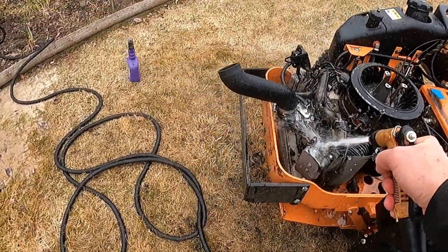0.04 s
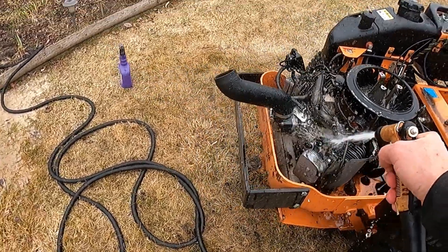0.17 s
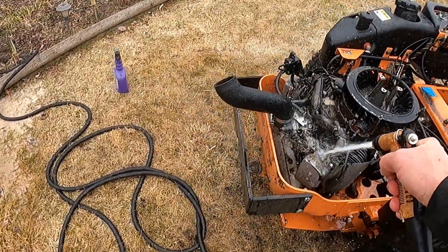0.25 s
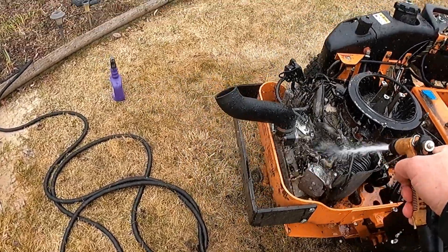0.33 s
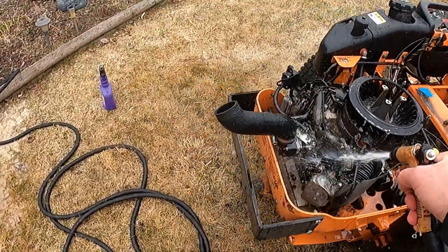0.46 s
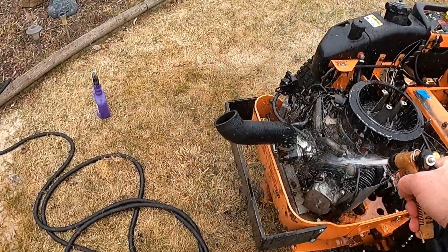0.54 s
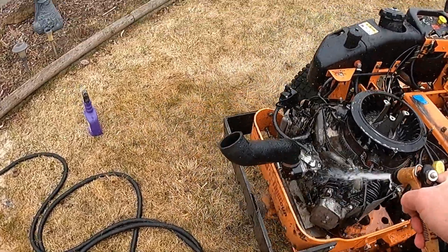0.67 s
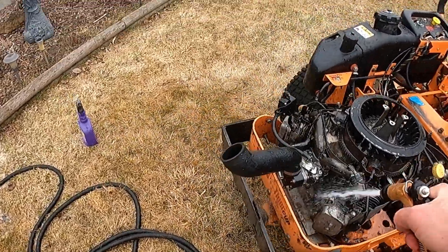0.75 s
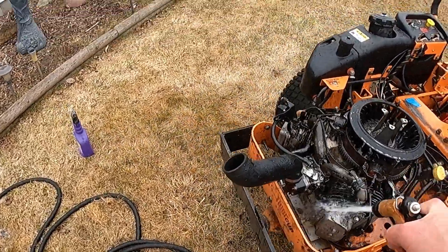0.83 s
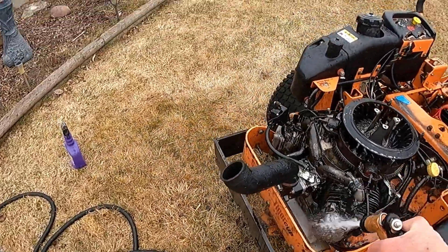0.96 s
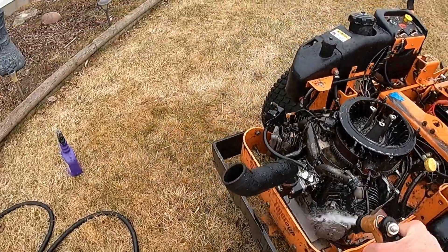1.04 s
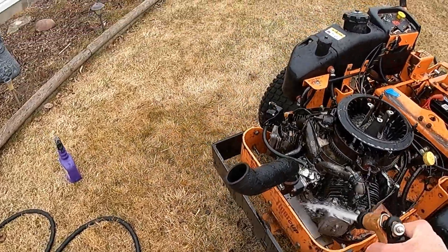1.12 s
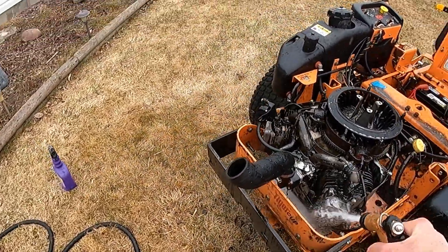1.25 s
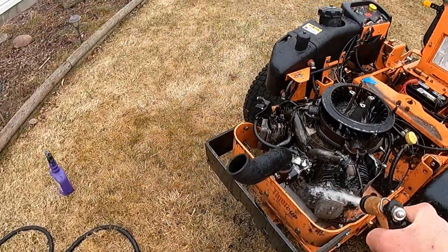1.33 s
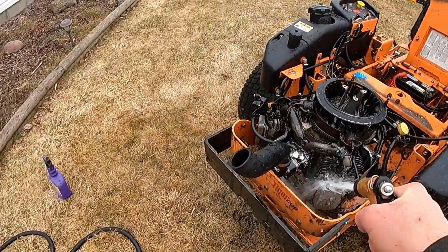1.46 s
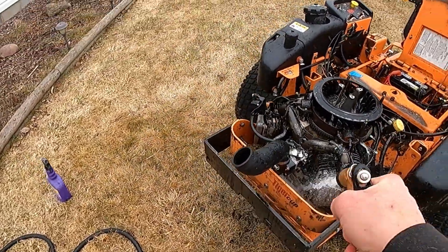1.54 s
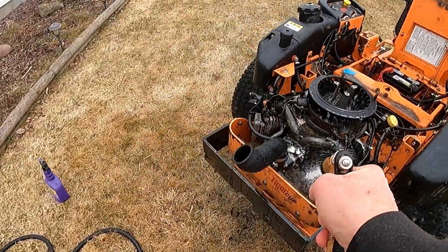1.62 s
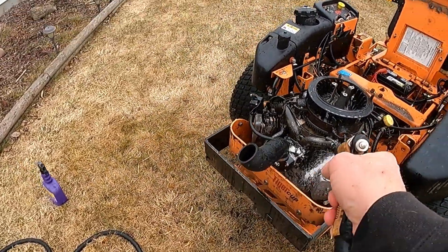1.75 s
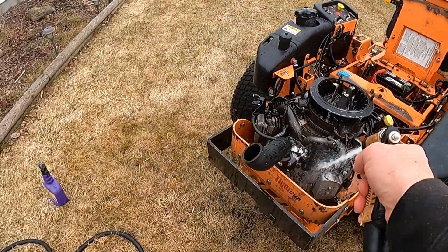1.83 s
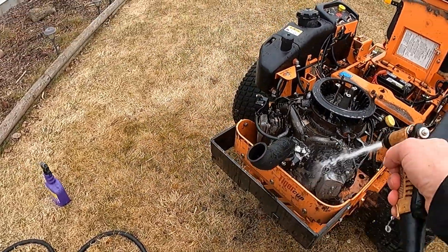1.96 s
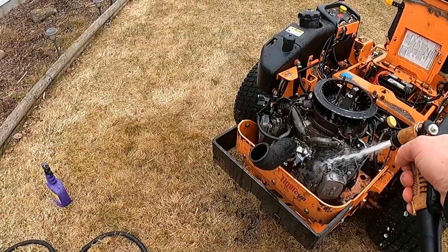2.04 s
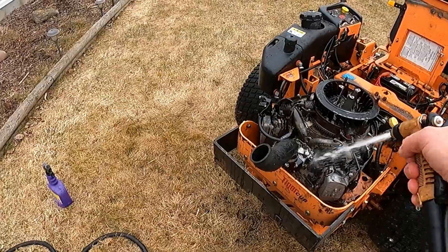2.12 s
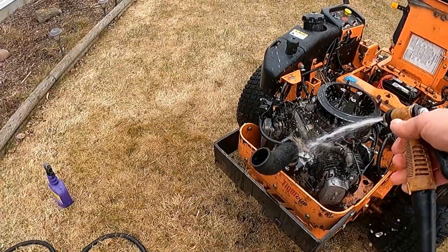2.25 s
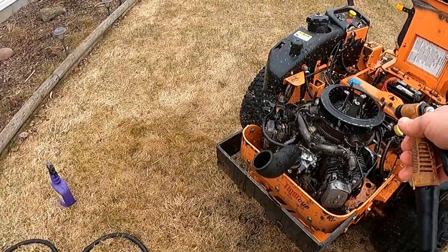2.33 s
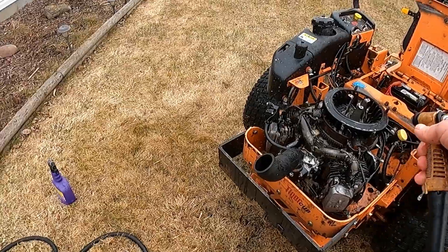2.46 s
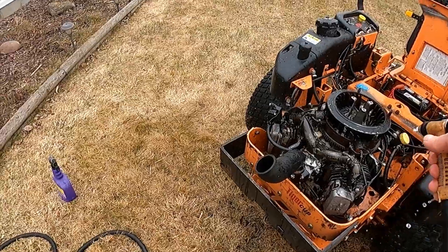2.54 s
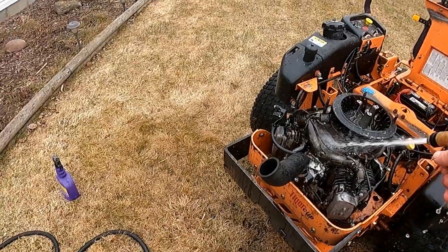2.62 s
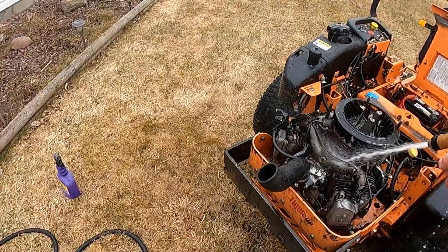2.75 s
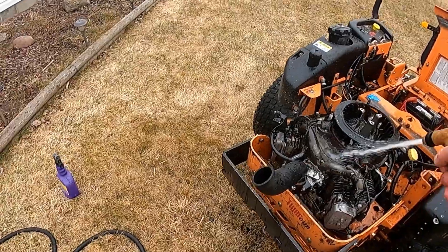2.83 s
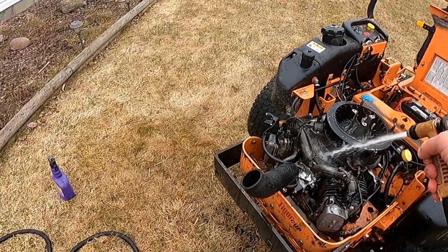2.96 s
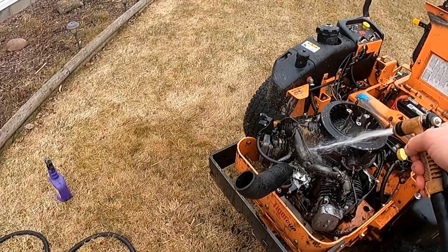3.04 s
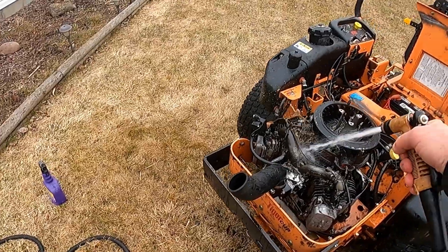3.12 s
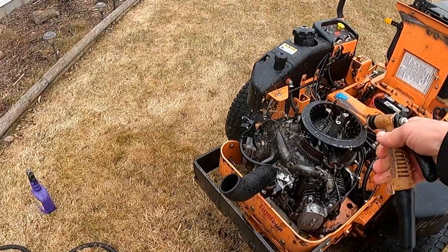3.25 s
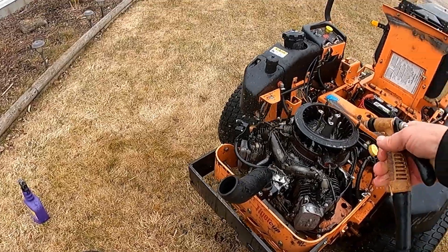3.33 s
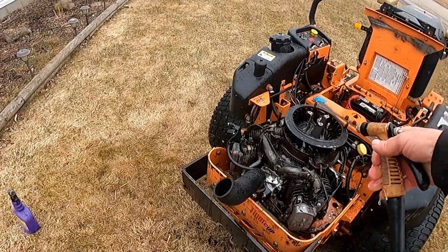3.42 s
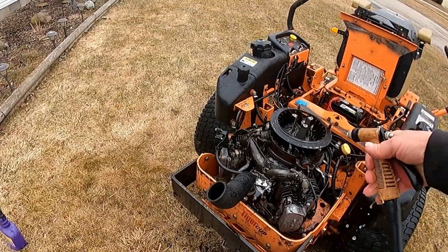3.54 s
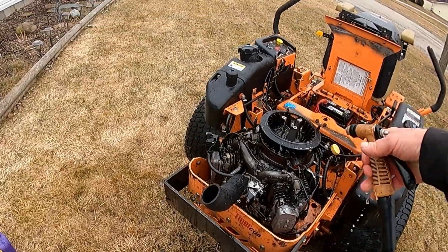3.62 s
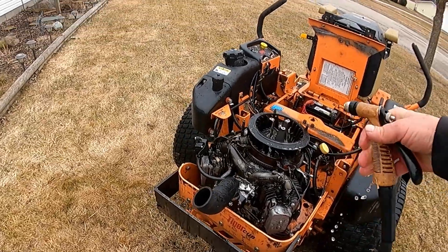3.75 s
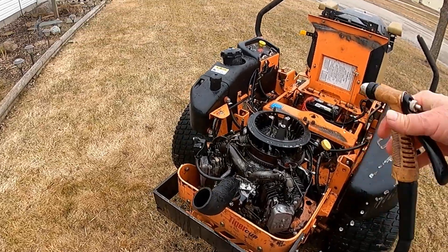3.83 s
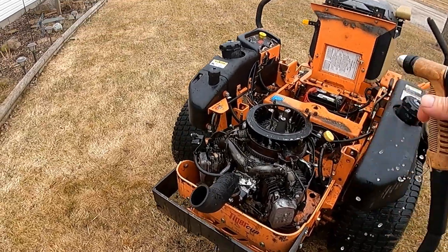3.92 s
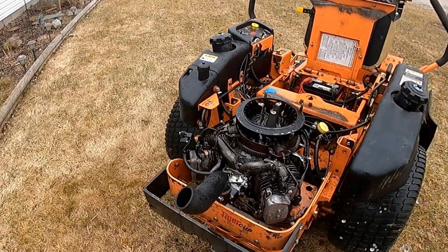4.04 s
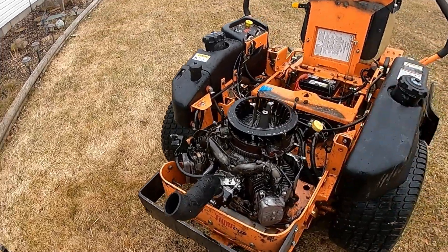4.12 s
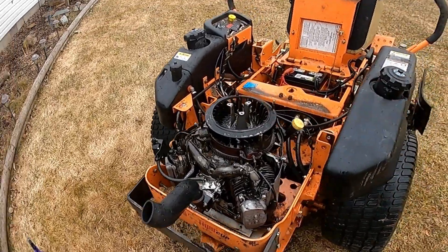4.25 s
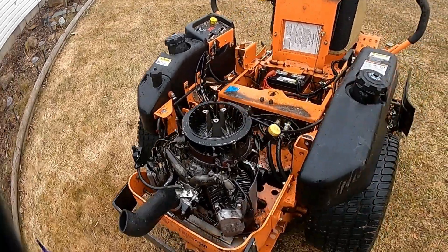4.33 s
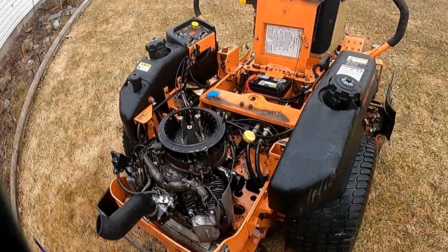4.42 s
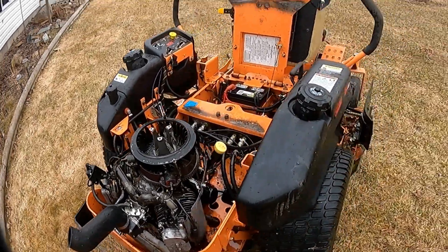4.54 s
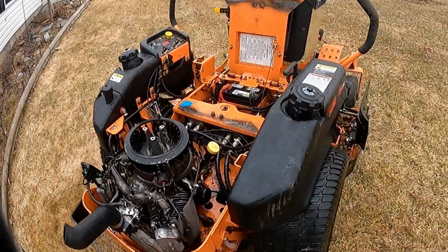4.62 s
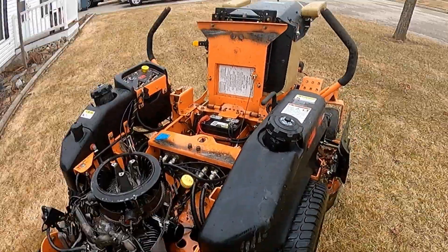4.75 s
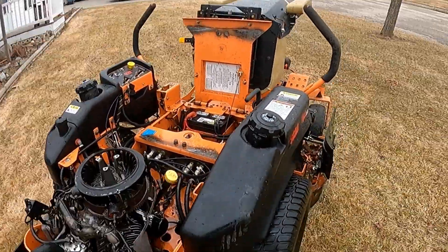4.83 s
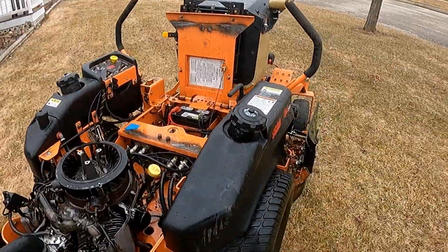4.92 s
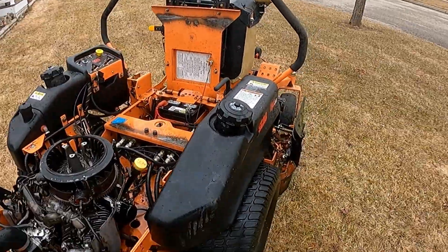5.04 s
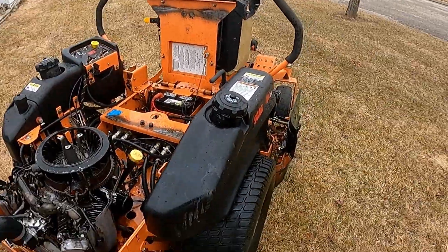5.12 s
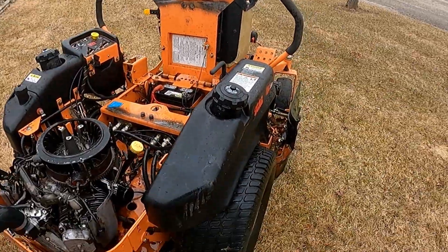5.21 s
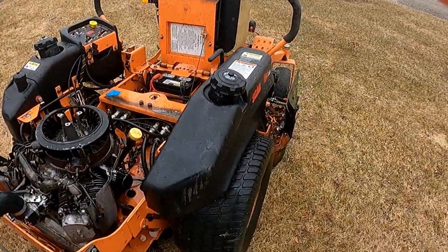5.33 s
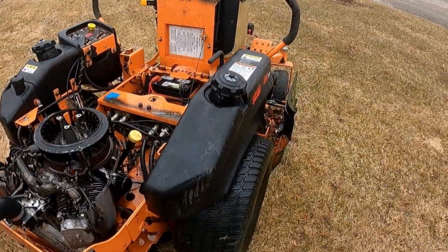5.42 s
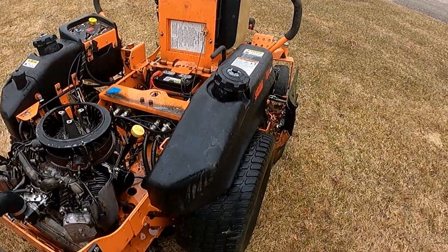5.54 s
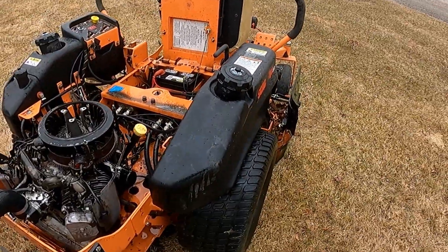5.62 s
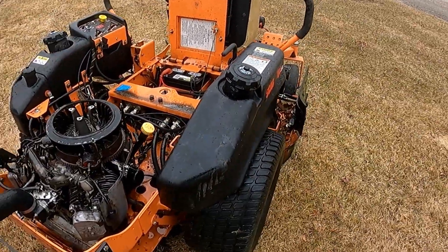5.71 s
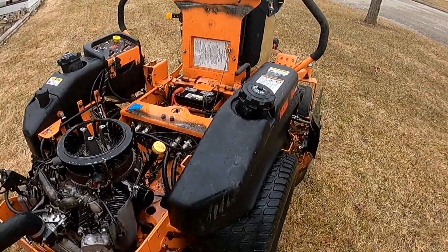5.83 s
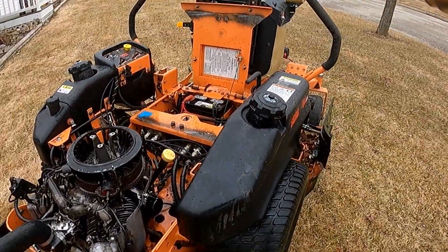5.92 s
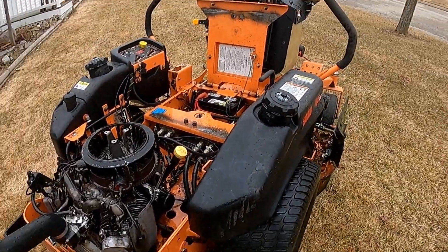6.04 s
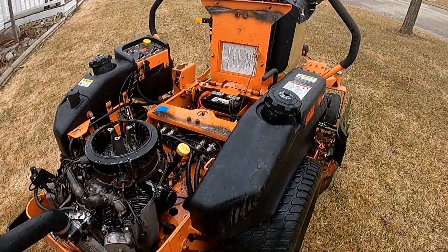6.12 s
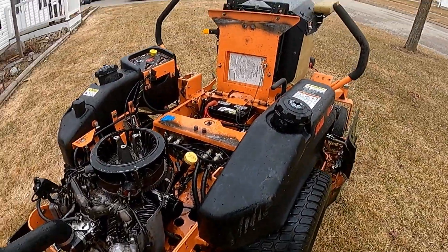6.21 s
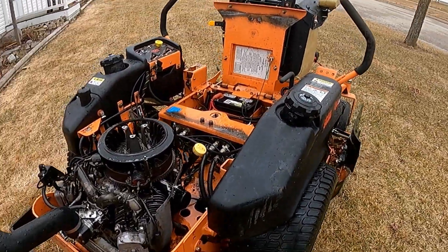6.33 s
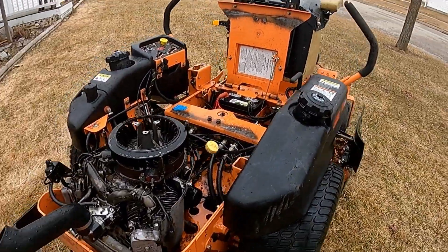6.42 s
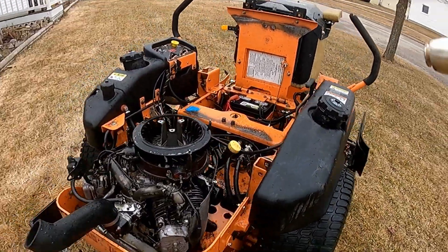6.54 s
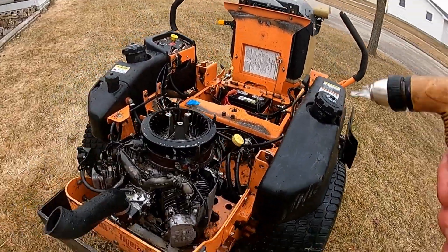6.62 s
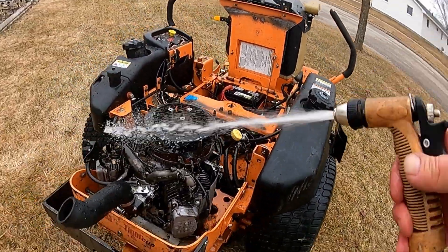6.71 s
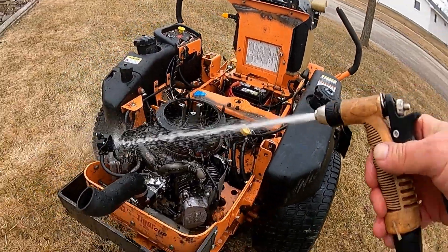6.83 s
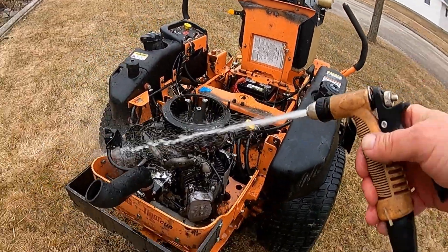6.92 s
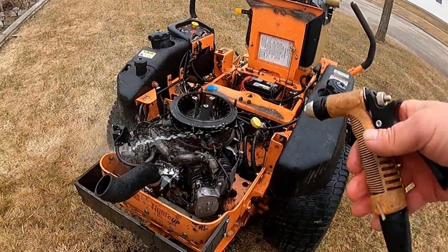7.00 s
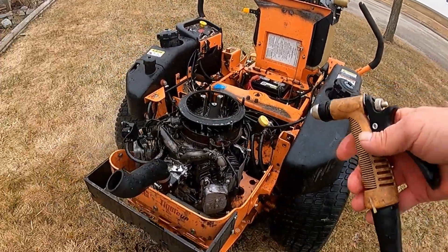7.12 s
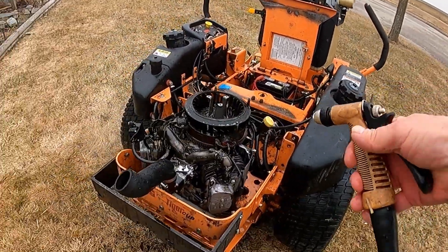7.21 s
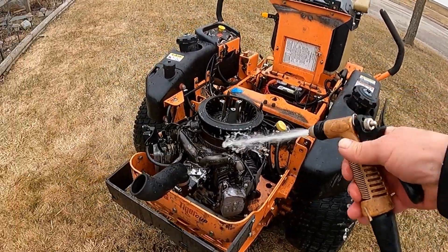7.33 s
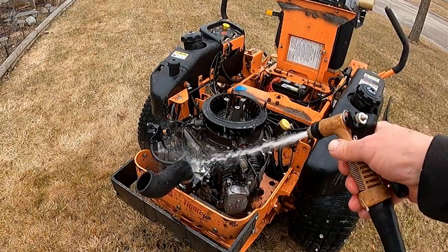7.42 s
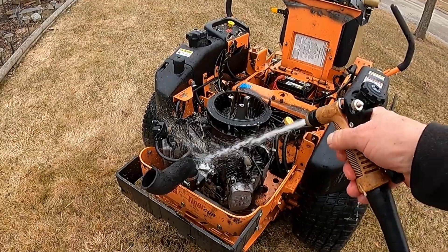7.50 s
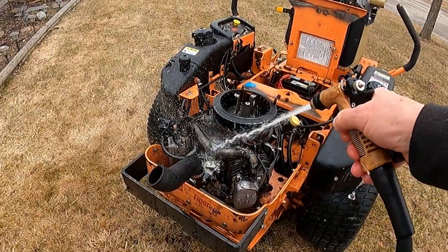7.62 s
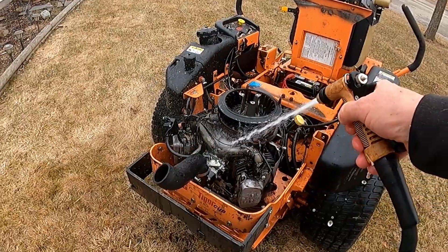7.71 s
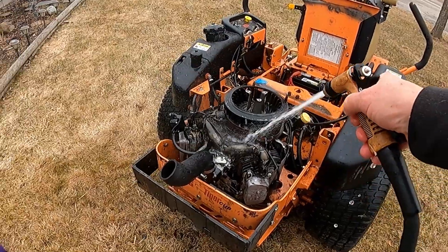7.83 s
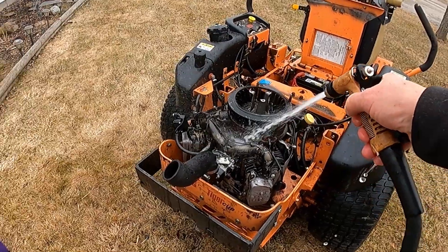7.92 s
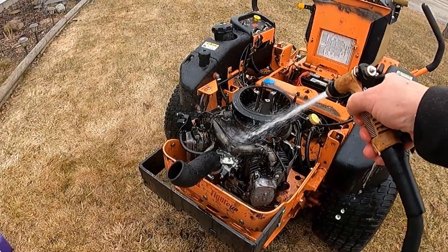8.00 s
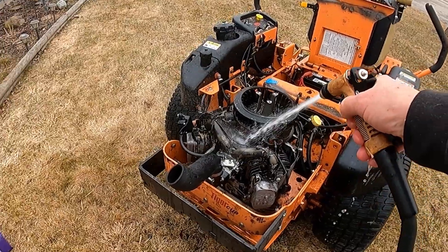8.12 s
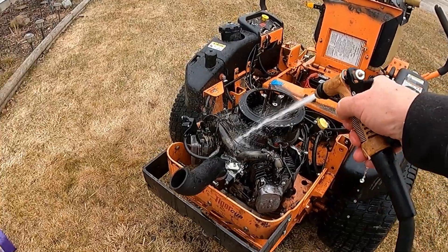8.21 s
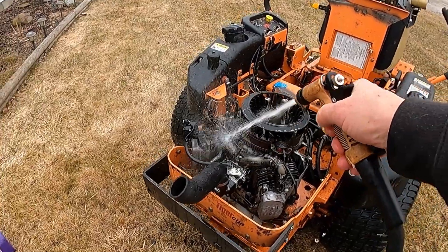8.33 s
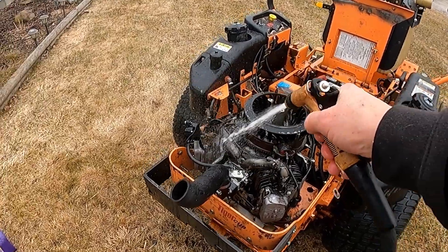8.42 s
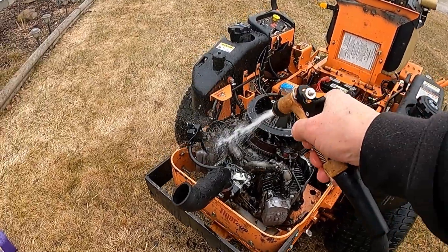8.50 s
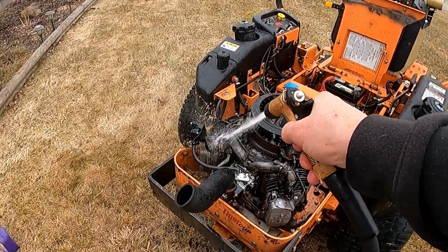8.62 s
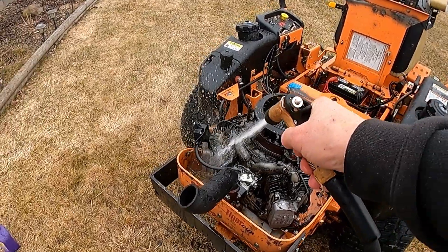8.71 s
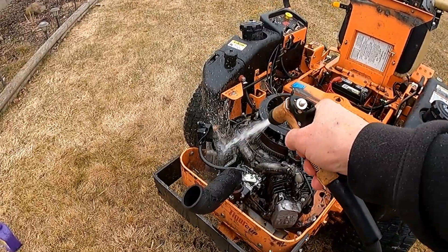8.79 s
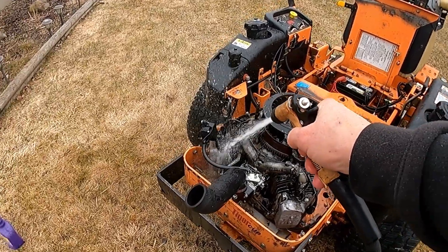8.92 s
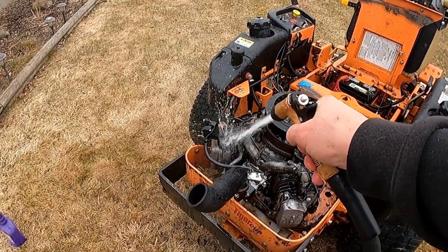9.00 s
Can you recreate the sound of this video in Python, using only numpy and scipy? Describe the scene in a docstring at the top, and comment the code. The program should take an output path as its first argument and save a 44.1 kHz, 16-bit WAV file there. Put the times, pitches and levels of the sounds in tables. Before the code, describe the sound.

A steady, sharp water jet beats on engine metal, its tone shifting as it crosses fins and hollows. Two bursts end in run-off pattering and small watery plinks over a faint distant rush. During the long pause the hand-held camera is knocked, one thud loud, with cloth scuffs and low air buffeting. Spray then returns, briefly and then continuously, slightly toward the right.

```python
"""Hosing down a mower engine

A garden hose nozzle sprays a mower's engine at arm's length, outdoors, in four bursts.
Noise showers of drops hiss, splash and slap on the metal, and ring resonances in its fins and hollows.
In the pauses water trickles as pattering noise and bubble tones over a distant rush and drone.
Blows and noise bursts through the case resonances bump and rub the hand-held camera; cloth scuffs."""
import sys
import numpy as np
from scipy import signal
from scipy.fft import rfft, irfft, next_fast_len
from scipy.io import wavfile
from scipy.ndimage import uniform_filter1d, map_coordinates

SR = 44100
rng = np.random.default_rng(int(sys.argv[2]) if len(sys.argv) > 2 else 0)


def to_wav(s):
    """Save 16-bit WAV."""
    ch = np.atleast_2d(s).T  # columns
    pcm = np.round(np.clip(ch, -1, 1) * 32767)  # PCM
    wavfile.write(sys.argv[1], SR, pcm.astype(np.int16))


N = 399546
# share of a left-minus-right setting that goes to each channel: left, then right
SIDES = np.array([[.5], [-.5]])


def amp(db):
    """Decibels to gain."""
    return 10 ** (np.asarray(db) / 20)


def unit(x):
    """Scale to rms 1."""
    return x / np.sqrt(np.mean(x ** 2) + 1e-20)


def clock():
    """The time of each sample, in seconds."""
    return np.arange(N) / SR


def along(points, hz):
    """Read (frequency, value) points on a log frequency axis."""
    f, v = np.transpose(points)
    return np.interp(np.log(hz + 1), np.log(f), v)


def curves(rows):
    """One automation curve for each column after the time."""
    time_s, *columns = np.transpose(rows)
    return np.array([np.interp(clock(), time_s, column) for column in columns])


def wobble(rate):
    """A smooth random curve with rate knots a second."""
    knots = rng.standard_normal(int(N * rate / SR) + 4)
    return map_coordinates(knots, [clock() * rate], order=2)


def bell(middle_s, length_s):
    """A smooth rise and fall around one moment."""
    return np.exp(-np.minimum(((clock() - middle_s) / length_s) ** 2, 20) * 2)


def swells(rows):
    """Sum of bell-shaped envelopes, one for each (middle_s, length_s, level_db) row."""
    return sum(amp(db) * bell(middle_s, length_s) for middle_s, length_s, db in rows)


def strike(start_s, t60):
    """Envelope of a sudden blow that falls 60 dB in t60 seconds."""
    age = clock() - start_s
    return (age >= 0) * amp(-60 * np.clip(age / t60, 0, 10))


def filtered(x, response):
    """x times a response of frequency."""
    size = next_fast_len(N + 8192, True)
    spectrum = rfft(x, size) * response(np.fft.rfftfreq(size, 1 / SR))
    return irfft(spectrum, size)[..., :N]


def under(hz, edge_hz):
    """Steep low-pass response."""
    return 1 / (1 + (hz / edge_hz) ** 12)


def coloured(x, spectrum):
    """x equalised by a (frequency_hz, level_db) curve, at rms 1."""
    return unit(filtered(x, lambda hz: amp(along(spectrum, hz))))


def resonance(modes, f):
    """Causal response of a set of (centre_hz, width_hz, level_db) modes."""
    return sum(amp(db) * 1j * f * width / (centre * centre - f * f + 1j * f * width)
               for centre, width, db in modes)


def ringing(x, modes):
    """x through steep-sided, zero-phase resonances, at rms 1."""
    return unit(filtered(x, lambda hz: resonance(modes, hz).real))


# stereo likeness of the noise: frequency_hz [Hz], likeness [0 to 1]
ALIKE = [(60, 0.8), (900, 0.88), (5000, 0.82), (13000, .66)]


def air_noise():
    """White noise as two close microphones hear it: shared mid, less side where the ears agree."""
    turn = lambda hz: np.arccos(np.clip(along(ALIKE, hz), -1, 1)) / 2
    mid_side = lambda hz: np.array([np.cos(turn(hz)), np.sin(turn(hz))])
    mid, side = filtered(rng.standard_normal((2, N)), mid_side)
    return np.array([mid + side, mid - side])


def patchy(x, depth_db):
    """Colour that shifts from moment to moment, by a blurred random gain over time and frequency."""
    z = signal.stft(x, nperseg=512)[2]
    field = rng.standard_normal(z.shape[1:])
    field = uniform_filter1d(field, size=6, axis=0)
    field = uniform_filter1d(field, size=12, axis=1)
    return signal.istft(z * amp(depth_db * unit(field)), nperseg=512)[1][:, :N]


def patter(rate, spread_db, life):
    """Envelope of drops of random size, rate a second; each one's energy fades by 1/e in life seconds."""
    hits = rng.random(N) < rate / SR
    energy = hits * amp(spread_db * np.minimum(rng.standard_normal(N), 3)) ** 2
    decaying = signal.lfilter([1], [1, -np.exp(-1 / (life * SR))], energy)
    return unit(np.sqrt(np.abs(decaying)))


# the trigger, and the level of the last water as t60:
# crack_s [s], full_s [s], shut_s [s], splash_db [dB], half_open_db [dB], tail_t60_s [s]
SQUEEZES = [(-.2, -.1, 2.425, -20.5, -10, .08), (2.683, 2.741, 3.413, -20.5, -12.5, 0.081),
            (6.767, 6.789, 7.168, -23.5, -10, 0.18), (7.458, 7.531, 9.5, -22, -8, .09)]
DRAIN_DB, DRAIN_T60_S = -24, 0.49  # the run-off after the valve shuts


def flow():
    """The valve leaks a thin jet, then opens fully; on shutting, the last water lands and drains away."""
    t, out = clock(), 0
    for crack, full, shut, _, half_open_db, tail_t60 in SQUEEZES:
        leak = amp(half_open_db) * ((t >= crack) & (t < full))
        jet = leak + ((t >= full) & (t < shut))
        out = out + jet + strike(shut, tail_t60) + amp(DRAIN_DB) * strike(shut, DRAIN_T60_S)
    return out


# the jet crosses a surface, square-on (+) or glancing (-): middle_s [s], length_s [s], splash_gain_db [dB]
CROSSINGS = [(0.155, 0.1, 5.5), (0.39, 0.12, 3.5), (1.35, 0.071, 5), (1.64, 0.27, -4.5), (2.143, 0.12, -5),
             (6.847, 0.11, -4.5), (6.991, 0.064, 5.5), (8.17, 0.23, 0), (8.39, 0.056, 3.5),
             (8.553, 0.047, 6), (8.698, 0.079, 10.5)]
SLAP_DB = -4.5  # heavy water against the splash
SWAY_DB, SWAY_PER_S = 1.5, 14  # the unsteady hand: depth, knots a second


def impact():
    """Splash and slap both grow as the jet meets the metal more squarely."""
    base_db = curves([(s, db) for crack, _, shut, db, *_ in SQUEEZES for s in (crack, shut)])[0]
    square_db = sum(db * bell(middle, length) for middle, length, db in CROSSINGS)
    square_db = square_db + SWAY_DB * wobble(SWAY_PER_S)
    return amp(base_db + square_db), amp(base_db + SLAP_DB + square_db)


# colour of drops on metal: frequency_hz [Hz], level_db [dB per Hz]
SPRAY = [(90, -54), (310, -25), (498, -20.5), (1110, -6.5), (1800, -7), (3000, -2), (5080, 0.5),
         (7430, 2.5), (8250, -2.5), (12200, -7.5), (13500, -16.5), (15600, -28)]
# treble hiss, one curve for each squeeze: time_s [s], level_db [dB]
MIST = [
    [(0.02, -15), (0.15, -17), (0.7, -15), (1.35, -16), (1.52, -20), (1.68, -13), (1.83, -22.5),
     (2.03, -15.5), (2.4, -15.5)],
    [(2.79, -12.5), (2.838, -19), (3.038, -14.5), (3.338, -19)],
    [(6.8, -22), (7.02, -17.5), (7.14, -21.5)],
    [(7.55, -15), (7.662, -15), (7.72, -19.5), (8.334, -14.5), (8.412, -19), (9.04, -14)],
]
# the valve spits as it opens: start_s [s], level_db [dB]
SPITS = [(2.693, -9.5), (6.7837, -11), (7.46, -26.5), (7.5288, -6)]
# single fat drops crack on the metal: start_s [s], level_db [dB]
CRACKS = [(0.35, -10), (1.428, -10), (1.4525, -9), (3.218, -16), (3.308, -10), (6.961, -8.5), (7.021, -4),
          (7.035, -8.5), (7.133, -7), (7.174, -6)]
STRAY_PER_S, STRAY_DB = 31, -30  # more fat drops, at random moments
CRACK_T60_S = 0.01  # decay of a fat drop


def spray():
    """Drops of three sizes hit the engine: fine ones hiss, medium ones splash, heavy ones slap."""
    mist = amp(curves([row for burst in MIST for row in burst])[0])
    splash, slap = impact()
    jet = flow()
    # the jet arrives in uneven slugs, each a shower of drops
    slugs = unit(amp(1.1 * wobble(45) + wobble(170)))
    impacts = air_noise() * slugs * patter(rate=4500, spread_db=3.0, life=0.00081)
    # the splatter keeps changing colour
    splatter = patchy(impacts, depth_db=2)

    def part(share):
        """The splatter's share of energy that one drop size takes."""
        return unit(filtered(splatter, lambda hz: amp(along(SPRAY, hz)) * np.sqrt(np.abs(share(hz)))))

    fine = part(lambda hz: 1 - under(hz, 5550))
    medium = part(lambda hz: under(hz, 4720) - under(hz, 2690)) * amp(1.1 * wobble(60))
    heavy = part(lambda hz: under(hz, 2250)) * amp(1.4 * wobble(60))
    # a harder jet shatters into finer drops, so the top grows fastest
    top = filtered(fine, lambda hz: 1 - under(hz, 11000))
    fine = fine + top * ((jet * mist / amp(-20.5)) ** 0.3 - 1)
    # air trapped in the valve leaves with a thin, bright spit
    spits = sum(amp(db) * strike(s, t60=.02) for s, db in SPITS) * coloured(air_noise(), SPRAY)
    spits = filtered(spits, lambda hz: 1 - under(hz, 1200))
    stray_drops = air_noise() * patter(rate=STRAY_PER_S, spread_db=2, life=0.0012)
    strays = amp(STRAY_DB) * coloured(stray_drops, SPRAY)
    cracks = sum(amp(db) * strike(s, CRACK_T60_S) for s, db in CRACKS) * coloured(air_noise(), SPRAY)
    drops = mist * fine + splash * medium + slap * heavy + strays
    return jet * (drops + flares(splatter) + drumming(impacts)) + spits + cracks


# levels between and under the bursts: time_s [s], background_db [dB], trickle_db [dB]
PAUSES = [(2.6, -44, -49), (3.6, -45.5, -50), (4.62, -42, -44), (4.95, -49.5, -49.5), (5.75, -46, -48.5),
          (6.3, -44, -48), (6.65, -47.5, -56), (7.4, -44, -54)]
# colour of the distant rush: frequency_hz [Hz], level_db [dB per Hz]
OUTDOORS = [(25, -2.5), (130, -10), (450, -5.5), (1050, 0), (1700, -4), (3000, -11.5), (15000, -27.5)]
# a far-off drone: centre_hz [Hz], width_hz [Hz], level_db [dB]
HUM = [(128.6, 33, 0)]
# the drone comes and goes: middle_s [s], length_s [s], level_db [dB]
HUM_SWELL = [(7.1, 2.2, -57)]
# the camera swings through the air: middle_s [s], length_s [s], level_db [dB]
SWINGS = [(4.7, .3, -39), (5.42, .15, -42), (6.33, .13, -36), (6.7, .12, -35), (6.3, 2, -51)]
# colour of the buffeting: frequency_hz [Hz], level_db [dB per Hz]
BUFFET = [(45, -2), (110, -9), (600, -55)]


def garden():
    """A distant outdoor rush and drone, and air that buffets the ports as the camera is moved."""
    far = amp(curves(PAUSES)[0]) * coloured(air_noise(), OUTDOORS)
    drone = swells(HUM_SWELL) * ringing(air_noise(), HUM)
    gusts = coloured(rng.standard_normal((2, N)), BUFFET)  # unrelated at the two ports
    return far + drone + swells(SWINGS) * gusts * amp(3.4 * SIDES)


def bubbles(rows, cycles, rise):
    """Each drip traps a bubble: a sine that dies 60 dB in a few cycles, its pitch lifting if rise is set."""
    out = np.zeros(N + SR)
    for start_s, db, hz in rows:
        t = np.arange(int(SR * cycles / hz) + 1) / SR
        age = t * hz / cycles
        envelope = amp(db - 60 * age) * (1 - np.exp(-t * hz / 2))
        tone = np.sin(2 * np.pi * hz * t * (1 + rise * age))
        out[int(start_s * SR):][:len(t)] += envelope * tone
    return out[:N]


# colour of trickling water: frequency_hz [Hz], level_db [dB per Hz]
TRICKLE = [(500, -22), (2000, 1.5), (7300, 12), (8500, 2), (12000, -9.5), (15000, -38)]
# single drips into puddles: start_s [s], level_db [dB], pitch_hz [Hz]
DRIPS = [(2.568, -28, 4970), (2.585, -22, 3480), (2.604, -21, 2802), (2.631, -26, 2850), (2.653, -24, 2800),
         (3.5227, -13, 1860), (3.566, -23.5, 1100), (3.6628, -20.5, 3120), (3.785, -24.5, 1780),
         (4.5738, -16.5, 2280), (5.066, -29, 2600), (5.9197, -17, 1330), (7.301, -25, 3000)]
# run-off drops tick on the frame below: start_s [s], level_db [dB]
TICKS = [(2.524, -29), (3.444, -32), (3.9082, -21.5), (4.248, -28), (4.367, -22), (7.2835, -26.5)]


def runoff():
    """Water runs off the engine: a patter that comes in clumps, droplets, and a few loud drips and ticks."""
    trickle_db = curves(PAUSES)[1] + 1.5 * wobble(8)
    drops = patter(rate=200, spread_db=5.3, life=.0009) * amp(2.5 * wobble(18))
    fizz = coloured(patchy(air_noise(), depth_db=1.5) * drops, TRICKLE)
    # each droplet pips at its own steady pitch for a few cycles
    when, size, pitch = rng.random((1200, 3)).T
    droplets = zip(when * N / SR, 8 + 20 * size ** 4, 8400 - 6400 * pitch)
    pips = bubbles(droplets, cycles=22, rise=0)
    ticks = sum(amp(db) * strike(s, CRACK_T60_S) for s, db in TICKS) * coloured(air_noise(), TRICKLE)
    drips = bubbles(DRIPS, cycles=31, rise=0.028)
    return amp(trickle_db) * (amp(-2.0) * fizz + pips) + ticks + drips


# the jet flares on an edge or panel: middle_s [s], length_s [s], level_db [dB], centre_hz [Hz]
FLARES = [(0.585, 0.041, -18.5, 3000), (0.764, 0.1, -19.5, 5060), (1.873, 0.078, -26.5, 900),
          (2.402, 0.026, -12, 4870), (3.159, 0.014, -19.5, 2700), (7.655, 0.058, -17, 3250),
          (8.692, 0.027, -13.5, 1700)]


def flares(splatter):
    """Each edge or panel that the jet catches lifts one band of the splatter."""
    out = 0
    for middle_s, length_s, db, hz in FLARES:
        band = signal.butter(2, [hz / 1.35, hz * 1.35], "bandpass", fs=SR)
        out = out + amp(db) * bell(middle_s, length_s) * unit(signal.lfilter(*band, splatter))
    return out


# resonances of the engine's cover, cooling fins and hollows, one table a part:
# centre_hz [Hz], width_hz [Hz], level_db [dB]
COVER = [(756, 80, -1), (1324, 38, 1.5), (1640, 89, -4)]
LONG_FINS = [(833, 13, 0), (887, 50, -8)]
MID_FINS = [(1138, 25, 0), (1398, 45, 3.5), (1790, 26, 0)]
SHORT_FINS = [(2027, 31, 1), (2177, 49, 2)]
RECESS = [(534, 49, -8.5), (1033, 100, 4)]
POCKET = [(1420, 220, 2), (1620, 150, 2), (1717, 85, 4)]
GAP = [(947, 100, 2), (1280, 390, 5.7)]
# the jet drums in a part: start_s [s], end_s [s], level_db [dB], part [resonance table]
AIMS = [(0.91, 1.42, -27.5, COVER), (1.015, 1.42, -27.5, LONG_FINS), (1.03, 1.27, -21, MID_FINS),
        (1.27, 1.42, -13.5, MID_FINS), (1.03, 1.06, -12.5, SHORT_FINS), (1.065, 1.19, -20.5, SHORT_FINS),
        (1.268, 1.315, -15, SHORT_FINS), (1.37, 1.425, -10, SHORT_FINS), (2.74, 3.12, -31.5, RECESS),
        (7.99, 8.045, -20, RECESS), (8.07, 8.47, -30, RECESS), (2.929, 3.125, -20.5, POCKET),
        (8.01, 8.33, -22.5, POCKET), (3.175, 3.405, -21, GAP), (8.37, 8.4, -14.5, GAP)]
ENTRY_S = 0.032  # time for the jet to slide into a part


def drumming(impacts):
    """The drops ring whichever parts the jet is on."""
    t, out = clock(), 0
    for modes in COVER, LONG_FINS, MID_FINS, SHORT_FINS, RECESS, POCKET, GAP:
        aim = 0
        for start, end, db, part in AIMS:
            if part is modes:
                inside_s = np.minimum(t - start, end - t)
                aim = aim + amp(db) * np.clip(inside_s / ENTRY_S + .5, 0, 1)
        out = out + aim * ringing(impacts, modes)
    return out


# bumps on the camera: start_s [s], thud_db [dB], brightness_hz [Hz], click_db [dB]
BUMPS = [(4.709, 0.5, 2400, -23), (4.799, -16, 600, -50), (5.303, -16, 200, -50), (5.311, -17, 900, -32),
         (5.461, -28, 600, -32), (6.0626, -7, 240, -28.5), (6.253, -19.5, 950, -31), (6.525, -22, 800, -36)]
# resonances of the camera case: centre_hz [Hz], width_hz [Hz], level_db [dB]
CASE = [(153, 91, -0.5), (330, 57, 3.5), (477, 37, 3), (637, 116, 1.5), (1060, 520, 0.5), (2150, 460, -4)]
# fingers rub on the case: middle_s [s], length_s [s], level_db [dB]
RUBS = [(4.285, 0.014, -34.5), (4.38, 0.031, -33.5), (6.31, 0.087, -36), (6.685, 0.053, -37)]
# the sleeve and hose scuff: middle_s [s], length_s [s], level_db [dB]
SCUFFS = [(4.851, 0.018, -16.5), (4.874, 0.015, -26), (5.878, 0.019, -26), (6.048, 0.0047, -27),
          (6.122, .0065, -34.5), (6.222, 0.012, -36), (6.333, 0.025, -32.5)]
# colour of cloth: frequency_hz [Hz], level_db [dB per Hz]
CLOTH = [(300, -19), (950, -1.5), (1400, -2), (4200, 2), (7500, -2), (15000, -42)]
PUSH_T60_S, CLICK_T60_S = .003, 0.036  # decay of one touch on the case; of its click
REBOUND_S, REBOUND_DB = 0.00411, -2.5  # every bump touches twice
RATTLE_DB, RATTLE_T60_S = -2.5, 0.046  # the mount rattles with it
CASE_LEFT_DB, CASE_TWIST_RAD = -9.5, 1.53  # left port against right: level, phase


def handling():
    """Bumps and rubs ring the camera's case; cloth scuffs close by."""
    thuds, snaps = np.zeros(N), np.zeros(N)
    for s, db, bright_hz, click_db in BUMPS:
        snaps += amp(click_db) * strike(s, CLICK_T60_S)
        # a softer touch holds fewer high frequencies
        soft = signal.butter(2, min(bright_hz, SR / 4), fs=SR)
        push = strike(s, PUSH_T60_S) + amp(REBOUND_DB) * strike(s + REBOUND_S, PUSH_T60_S)
        rattle = amp(RATTLE_DB) * strike(s, RATTLE_T60_S) * rng.standard_normal(N)
        blow = signal.lfilter(*soft, push + rattle)
        thuds += amp(db) * blow / blow.max()
    grain = air_noise() * patter(rate=520, spread_db=3.0, life=0.0028)
    rubs = swells(RUBS) * coloured(grain, [(400, 5.0), (12000, -27)])

    def ports(hz):
        """Case response at each port: nearer to the right, and out of step."""
        return resonance(CASE, hz) * amp(SIDES * CASE_LEFT_DB) * np.exp(1j * SIDES * CASE_TWIST_RAD)

    case = filtered(thuds + rubs, ports)
    fibres = patter(rate=2200, spread_db=3, life=.0006)
    scuffs = swells(SCUFFS) * coloured(air_noise() * fibres, CLOTH)
    clicks = snaps * coloured(air_noise(), CLOTH)
    return case + (scuffs + clicks) * amp(-4.1 * SIDES)  # these too lean to the right


# phase by which the left side leads: frequency_hz [Hz], lead_rad [radians]
LEAD = [(100, 0.49), (3500, -0.73), (7500, 0.11), (15000, 0.87)]
# left minus right: frequency_hz [Hz], difference_db [dB]
LEFT = [(900, -2), (7000, -2.5), (12000, 0.5)]


def scene():
    """The engine stands a little to the right, so the left side hears most of it softer and its mids later."""
    placed = lambda hz: amp(SIDES * along(LEFT, hz)) * np.exp(1j * SIDES * along(LEAD, hz))
    return filtered(spray() + runoff(), placed) + handling() + garden()


TOP_HZ = 15700  # band limit


def record(dry):
    """The camera rounds off the highest peaks and keeps nothing above its band limit."""
    rounded = dry / (1 + np.abs(dry / 1.02) ** 6) ** (1 / 6)
    return filtered(rounded, lambda hz: hz < TOP_HZ)


dry = scene()
out = record(dry)
to_wav(out)
```